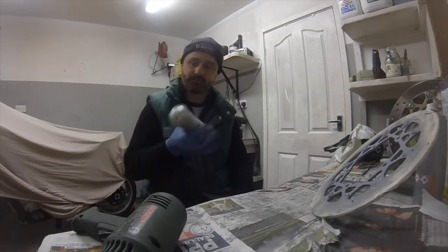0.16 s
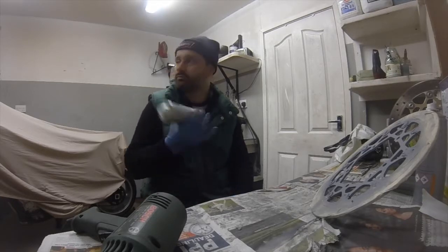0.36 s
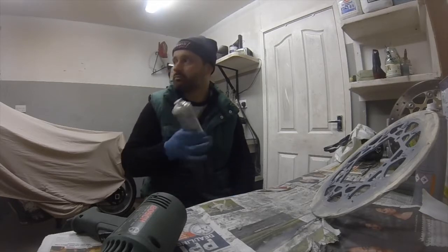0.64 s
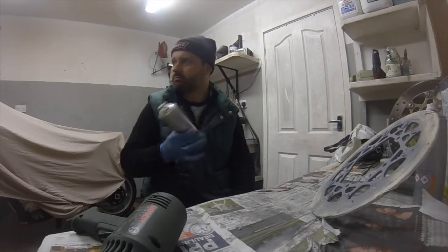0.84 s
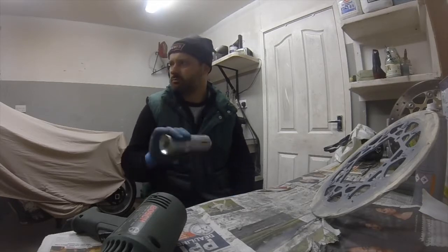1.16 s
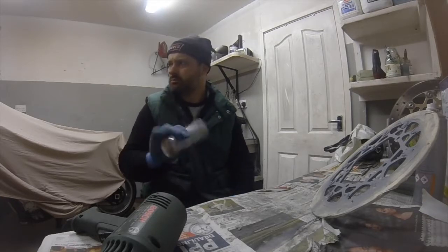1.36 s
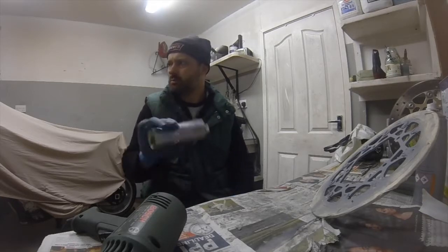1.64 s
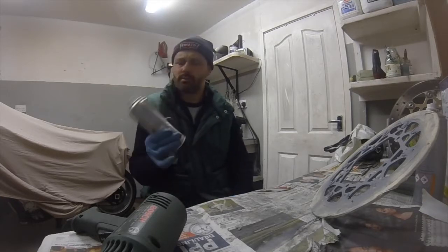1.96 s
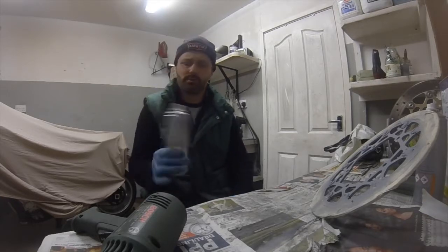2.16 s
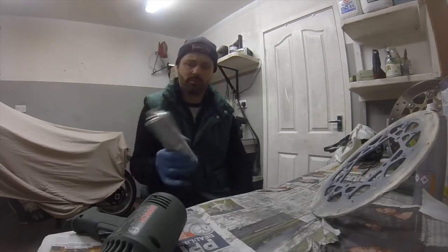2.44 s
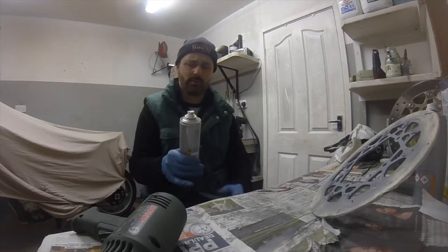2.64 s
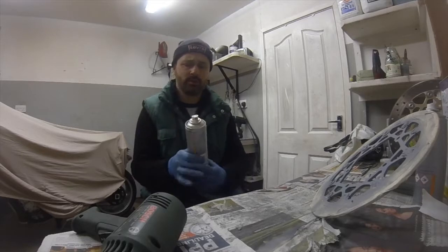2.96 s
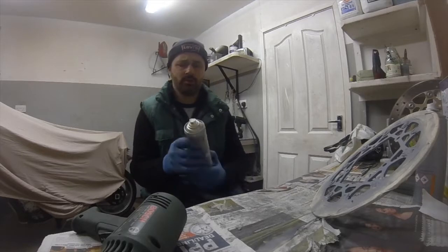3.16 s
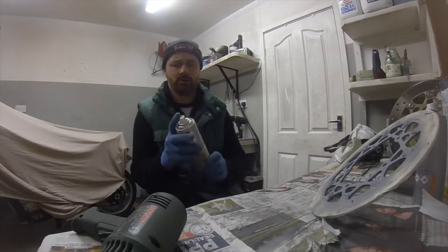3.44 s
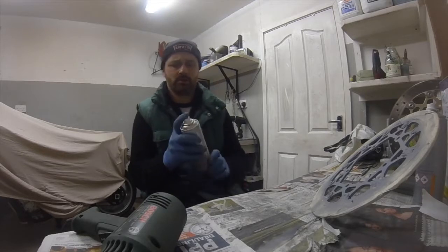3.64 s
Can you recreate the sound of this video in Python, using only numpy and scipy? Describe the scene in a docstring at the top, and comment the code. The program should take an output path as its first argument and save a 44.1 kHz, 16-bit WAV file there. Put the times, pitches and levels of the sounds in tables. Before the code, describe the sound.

A spray paint can is shaken vigorously close to the microphone in a small garage, its ball clacking sharply with light skittering and faint paint sloshes; then shaking stops, the ball drops, ticks and gloves rub.

```python
"""In a small garage, over a faint rumble and hum, a spray paint can is shaken by hand. Its mixing ball strikes
the ends about ten times a second, glances off the wall and skips lightly in between, and the paint sloshes.
The shaking stops, the ball drops once more, ticks and rolls, and gloves rub on the can. Contacts are snaps of
decaying noise with ringing modes, filtered by the shell's colours and answered by bench and room.
The slosh is swarms of sine bubbles; rub, roll and rumble are coloured noise."""
import sys
import numpy as np
from scipy import signal
from scipy.fft import rfft, irfft, next_fast_len
from scipy.io import wavfile
from scipy.ndimage import map_coordinates

SR = 44100
rng = np.random.default_rng(int(sys.argv[2]) if len(sys.argv) > 2 else 0)


def to_wav(s):
    """Save 16-bit WAV."""
    ch = np.atleast_2d(s).T  # columns
    pcm = np.round(np.clip(ch, -1, 1) * 32767)  # PCM
    wavfile.write(sys.argv[1], SR, pcm.astype(np.int16))


N = 167580


def amp(db):
    """Decibels to gain."""
    return 10 ** (np.asarray(db) / 20)


def unit(x):
    """Scale to rms 1."""
    return x / np.sqrt(np.mean(x ** 2) + 1e-20)


def along(points, hz):
    """Read a curve of (f/Hz, value) points on a log frequency axis."""
    f, v = np.transpose(points)
    return np.interp(np.log(hz + 1), np.log(f + 1), v)


def add(track, s, sound):
    """Mix a sound into a track at s seconds."""
    i = max(round(s * SR), 0)
    track[i:i + len(sound)] += sound[:len(track) - i]


def causal(points, size=1024):
    """Minimum-phase impulse response of a colour, by folding its cepstrum."""
    hz = np.fft.rfftfreq(size, 1 / SR)
    cepstrum = irfft(np.log(amp(along(points, hz))))
    cepstrum[1:size // 2] *= 2
    cepstrum[size // 2 + 1:] = 0
    return irfft(np.exp(rfft(cepstrum)))


def noise(points):
    """Steady coloured noise of rms 1."""
    m = next_fast_len(N + SR // 2)
    colour = amp(along(points, np.fft.rfftfreq(m, 1 / SR)))
    return unit(irfft(rfft(rng.standard_normal(m)) * colour, m)[:N])


def wobble(rate):
    """A smooth random curve through rate knots a second."""
    knots = rng.standard_normal(int(N * rate / SR) + 4)
    return map_coordinates(knots, [np.arange(N) * rate / SR])


# broad colour of the room's rumble: f/Hz, relative level/dB
RUMBLE_COLOUR = [(20, -4.5), (50, -4), (110, -10.5), (190, -12), (280, -12), (375, -11), (480, -20.5),
                 (900, -22.5), (1500, -23), (4000, -29.5), (6200, -39), (13000, -43.5), (15000, -56.5)]


def room_rumble(level_db=-55.5):
    """Steady broadband noise, strongest in the lows."""
    return amp(level_db) * noise(RUMBLE_COLOUR)


# faint tones in the room: f/Hz, rms level/dB
HUM_TONES = [(188, -72.5), (374, -72)]


def hum(waver_per_s=14):
    """Two low tones that waver in level and phase, as sine and cosine parts drift apart."""
    t = np.arange(N) / SR
    out = np.zeros(N)
    for hz, db in HUM_TONES:
        sine = wobble(waver_per_s) * np.sin(2 * np.pi * hz * t)
        cosine = wobble(waver_per_s) * np.cos(2 * np.pi * hz * t)
        out += amp(db) * unit(sine + cosine)
    return out


# how long each band of the room rings: f/Hz, T60/s
ROOM_DECAY = [(300, 0.17), (1500, 0.3), (5000, 0.37), (9000, 0.25), (15000, 0.55)]
# tone of the room's tail: f/Hz, relative level/dB
ROOM_TONE = [(300, 3), (1000, 2), (2500, 6.5), (5000, -2), (8000, 3.5), (14000, -6.5)]


def garage(size, room_db=-5, room_rise_s=.008, bench_db=-8, bench_s=.0052, bench_t60_s=.02,
           echo_db=5.5, echo_spacing_s=.0025, echo_blend_s=.052):
    """Scattered answer of the workbench and the room to a sharp click, as shaped decaying noise."""
    hz, t, z = signal.stft(rng.standard_normal(size + 256), SR, nperseg=256)
    decay_db = -60 * t / along(ROOM_DECAY, hz)[:, None]
    shape = amp(along(ROOM_TONE, hz)[:, None] + decay_db)
    tail = signal.istft(z * shape, SR, nperseg=256)[1][:size]
    t = np.arange(size) / SR
    # early echoes stand out in level, then blend
    echoes = np.interp(t / echo_spacing_s, np.arange(size), rng.standard_normal(size))
    rise = 1 - np.exp(-(t / room_rise_s) ** 2)
    tail = tail * rise * amp(echo_db * echoes * np.exp(-t / echo_blend_s))
    bench = rng.standard_normal(size) * (t > bench_s) * amp(-60 * t / bench_t60_s)
    return amp(room_db) * unit(tail) + amp(bench_db) * unit(bench)


def in_room(x, room_db):
    """A dry sound plus the garage's answer to it."""
    room = garage(size=SR // 2)
    return x + amp(room_db) * signal.fftconvolve(x, room / np.sqrt(len(room)))[:N]


# stretches in which the ball skips: start t/s, end t/s
SKIP_SPANS = [(0, .57), (.76, 2.15), (2.27, 2.54)]
# colour of the small contacts: f/Hz, relative level/dB
SKIP_COLOUR = [(150, -20), (500, -17), (900, 3), (1600, -2), (3000, -1), (5200, 1), (6500, -9),
               (10000, -16.5), (15000, -30.5)]


def skitter(per_s=70, level_db=-42.5, spread_db=7.5):
    """The ball skips lightly along the wall: brief noise taps at random times and levels, in the room."""
    taps = np.zeros(N)
    for start, end in SKIP_SPANS:
        for s in np.arange(start, end, 1 / per_s):
            tap = amp(-spread_db * rng.random()) * rng.standard_normal(size=130)
            add(taps, s + rng.random() / per_s, tap)
    coloured = signal.fftconvolve(taps, causal(SKIP_COLOUR))[:N]
    return amp(level_db) * unit(in_room(coloured, room_db=1.5))


def shell_crack(size, count=3, t60_s=.0051, rebound_s=.0012, rebound_db=-1.5, snap_db=11.5):
    """The shell snaps a few times in quick succession as the blow runs up and down it."""
    t, out = np.arange(size) / SR, np.zeros(size)
    for k in range(count):
        flex = rng.standard_normal(size) * amp(-60 * t / t60_s)
        flex[0] += amp(snap_db)  # sharp edge over the noise
        spacing = rebound_s * (1 + .15 * rng.uniform(-1, 1))
        add(out, k * spacing, amp(rebound_db * k * k) * flex)  # the loss grows with k squared
    return out


# ringing modes of the can, before random detuning and level spread: f/Hz, level/dB, T60/s
CAN_MODES = [(845, -35, 0.035), (1600, -40, .05), (2800, -22.5, .04), (5200, -52.5, .04),
             (5620, -21.5, 0.035), (10600, -39, 0.023)]


def shell_ring(size, spread_db=5, detune=.024):
    """Short decaying sines, the modes of the can, varied a little at each contact."""
    t, out = np.arange(size) / SR, np.zeros(size)
    for hz, db, t60 in CAN_MODES:
        envelope = amp(db + rng.normal(0, spread_db) - 60 * t / t60)
        out += envelope * np.sin(2 * np.pi * hz * rng.normal(1, detune) * t)
    return out


def spot(size=1024, ripple_db=2.5, width_hz=325.1):
    """Each spot on the shell favours other resonances: random peaks and dips in its colour."""
    hz = np.fft.rfftfreq(size, 1 / SR)
    ripple = map_coordinates(rng.standard_normal(size), [hz / width_hz], mode="mirror")
    return causal(np.column_stack([hz, ripple_db * ripple]))


# colours of the steel shell, each f/Hz, relative level/dB: main clack, low body, bright edge, domed base
CLACK_COLOUR = [(500, -50), (2000, -27.5), (3100, -17.5), (3600, -1.5), (4250, 0), (4550, 2), (4850, 2.5),
                (5050, 3.5), (5280, 4), (5600, -3), (6200, -6.5), (7000, -16.5), (10000, -39.5)]
BODY_COLOUR = [(100, -38), (350, -31), (520, -12), (700, -7.5), (900, 0.5), (1200, -3), (1550, 3.5),
               (2100, -2.5), (3000, 0.5), (6000, -64.5)]
EDGE_COLOUR = [(3000, -47.5), (6200, -15), (7400, -3), (7900, -4), (8600, -1.5), (9500, -4), (10000, -3),
               (11200, -11.5), (12400, -14), (13300, -18), (15000, -26.5), (15600, -34), (16500, -38)]
DOME_COLOUR = [(500, -55), (1200, -38), (2400, -7.5), (2800, -7.5), (3030, 2.5), (3300, -6), (3800, -21),
               (6000, -46.5)]


def shell_ranges():
    """Filters for the four ranges in which the shell answers: clack, body, edge, dome."""
    return np.array([causal(c) for c in (CLACK_COLOUR, BODY_COLOUR, EDGE_COLOUR, DOME_COLOUR)])


def contact(levels, ranges, room_db, size=3072):
    """One contact: the crack, the short ring of the shell and the room, weighted range by range."""
    source = shell_crack(size) + shell_ring(size)
    room = garage(size=SR // 2)
    ranges = signal.fftconvolve(ranges, spot()[None], axes=1)
    colour = sum(amp(db) * c / np.linalg.norm(c) for db, c in zip(levels, ranges))
    out = amp(room_db) * np.sqrt(size / len(room)) * signal.fftconvolve(room, colour)
    direct = signal.fftconvolve(source[None], ranges, axes=1)[:, :size]
    add(out, 0, sum(amp(db) * unit(d) for db, d in zip(levels, direct)))
    return out


def knocks(rows, clack_db, body_db, edge_db, dome_db, room_db):
    """Lighter contacts, in which the dome follows the clack; the settings trim the rows' levels."""
    out, ranges = np.zeros(N), shell_ranges()
    for s, clack, body, edge in rows:
        levels = [clack + clack_db, body + body_db, edge + edge_db, clack + dome_db]
        add(out, s, contact(levels, ranges, room_db))
    return out


# glancing knocks, before trims: t/s, clack level/dB, low body level/dB, bright edge level/dB
WALL_GLANCES = [(0.001, -31.5, -34.5, -39), (0.053, -17, -29.5, -24.5), (0.134, -26.5, -34.5, -25),
                (0.149, -19.5, -31.5, -27), (0.197, -26.5, -39, -34.5), (0.25, -27, -38, -38),
                (0.294, -43.5, -46, -51), (0.303, -47, -50, -45.5), (0.381, -24.5, -36.5, -39),
                (0.4845, -26.5, -40, -32.5), (0.499, -27.5, -49, -45), (0.559, -28, -34.5, -39.5),
                (0.676, -28, -29, -37.5), (0.708, -34, -53.5, -48), (0.772, -41.5, -30, -43),
                (0.801, -34.5, -30, -43.5), (0.865, -25, -34.5, -38), (0.942, -34.5, -40.5, -43),
                (0.979, -22.5, -34.5, -36.5), (1.002, -40, -38.5, -38.5), (1.045, -29, -44.5, -32),
                (1.08, -29, -57, -32.0), (1.101, -23, -29.5, -25.5), (1.207, -24, -44.5, -47),
                (1.306, -35, -43.5, -35.5), (1.398, -28, -47, -33), (1.43, -34.5, -33.5, -37),
                (1.51, -22, -41.5, -37), (1.537, -32.5, -46, -44.5), (1.56, -31.5, -37, -51.5),
                (1.637, -24.5, -63.5, -27.5), (1.662, -23, -33.5, -29), (1.757, -32, -44, -37.5),
                (1.788, -33.5, -37.5, -41), (1.86, -25.5, -51.5, -30.5), (1.876, -26, -61.5, -31.5),
                (1.897, -22.5, -32, -28), (1.993, -23, -36.5, -30), (2.026, -26.5, -36, -47.5),
                (2.074, -19, -34.5, -29), (2.093, -29.5, -55, -30.5), (2.105, -24.5, -41.5, -25.5),
                (2.124, -22.5, -28, -44), (2.282, -27.5, -55.5, -34), (2.311, -42.5, -48, -44),
                (2.368, -40, -41.0, -52), (2.391, -43.0, -37.5, -55.5), (2.431, -39.5, -48, -58),
                (2.507, -24, -55, -35.5), (2.524, -28.5, -36, -31.5), (2.549, -36, -42.5, -54)]


def wall_glances():
    """The ball glances off the wall of the can between strikes."""
    return knocks(WALL_GLANCES, clack_db=-13.0, body_db=-11.5, edge_db=-12, dome_db=-22.5, room_db=1)


# hard strikes, range levels before trims: t/s, clack level/dB, low body level/dB, bright edge level/dB,
# dome level/dB, room send level/dB
END_STRIKES = [(0.029, -3.5, -36, -17.5, -30.5, -3.5), (0.0404, -8, -28, -30, -32, 5.5),
               (0.1132, -3.5, -31.5, -16.5, -27.5, 2), (0.2342, -10, -39.5, -32.5, -29, -1),
               (0.3598, -4.5, -34, -17.5, -28, 0), (0.4613, -13.5, -34.5, -26, -42.5, 2),
               (0.5387, -8, -31.5, -28.5, -31, 4.5), (0.7474, -4, -30, -29, -22, -1),
               (0.848, -4, -27.5, -25, -22, -1), (0.9571, -1.5, -26.5, -25.5, -22, -4),
               (1.039, -7, -33.5, -23.5, -26.5, 3.5), (1.186, -10.5, -33.5, -18.5, -33.5, -3),
               (1.292, -11.5, -38, -31.5, -39, 3.5), (1.3865, -6, -36.5, -21, -42, -4.5),
               (1.4093, -4.5, -32, -29.5, -28, 1.5), (1.4763, -3, -38.5, -17, -30, -4.5),
               (1.6138, -3, -62, -17.5, -35.5, -10), (1.7364, -10, -43.5, -24.5, -33.5, 0),
               (1.835, -5, -56, -18.5, -30.5, -4), (1.9782, -10.5, -38, -23.5, -37, 0.5),
               (2.0592, -7.5, -32, -18.5, -28.5, -5.5), (2.2608, -3.5, -26.5, -24, -20.5, -0.5),
               (2.344, -2.5, -28, -20.5, -31, -5), (2.4497, -3, -27.5, -27, -21.5, -1.5)]


def end_strikes(clack_db=-24.5, body_db=-12.0, edge_db=-12.0, dome_db=-12):
    """The ball hits the ends of the can and rings the domed base; the settings trim the rows' levels."""
    out, ranges = np.zeros(N), shell_ranges()
    for s, clack, body, edge, dome, room in END_STRIKES:
        levels = [clack + clack_db, body + body_db, edge + edge_db, dome + dome_db]
        add(out, s, contact(levels, ranges, room))
    return out


# paint sloshing at the turn of a stroke: t/s, length/s, centre pitch f/Hz, dry level/dB
PAINT_SLOSHES = [(0.279, 0.046, 2970, -43), (0.682, 0.068, 1700, -40.5), (.765, 0.048, 2740, -48.5),
                 (0.862, 0.061, 3000, -40), (0.981, .055, 1750, -41), (1.294, 0.048, 3770, -39.5),
                 (1.411, .05, 1390, -42), (1.526, 0.055, 2290, -50), (1.776, 0.036, 2340, -46),
                 (2.008, 0.05, 2230, -41.5)]


def slosh(count=60, cycles=14, pitch_spread=.22):
    """Each slosh of paint is a swarm of short sine bubbles; the higher the bubble, the faster it dies."""
    out, t = np.zeros(N), np.arange(SR // 40) / SR
    for s, length, pitch, db in PAINT_SLOSHES:
        swarm = np.zeros(SR // 4)
        times = length * rng.beta(2, 2, count)
        pitches = pitch * np.exp(pitch_spread * rng.standard_normal(count))
        for when, hz in zip(times, pitches):
            add(swarm, when, np.sin(2 * np.pi * hz * t) * amp(-60 * t * hz / cycles))
        add(out, s, amp(db) * swarm * np.sqrt(length * SR) / np.linalg.norm(swarm))
    return in_room(out, room_db=-6)


# resonances of the base: f/Hz, relative level/dB
BASE_COLOUR = [(300, -30), (700, -13.5), (1150, -7.5), (1550, 1.5), (1850, -3.5), (2300, -10), (3000, 0),
               (3400, -10), (4100, -2), (4800, 3), (5500, -6), (6500, -21), (7500, -14), (9000, -19),
               (12500, -17.5), (15000, -31.5)]


def last_drop(at_s=2.7609, level_db=-38.5, room_db=-1):
    """The ball falls softly onto the base of the upright can and rings only its main resonances."""
    out = np.zeros(N)
    add(out, at_s, contact([level_db], causal(BASE_COLOUR)[None], room_db))
    return out


# ticks of the ball settling, before trims: t/s, clack level/dB, low body level/dB, bright edge level/dB
SETTLING_TICKS = [(2.8514, -48, -49, -64), (2.8883, -39, -49, -70.5), (2.9138, -33.5, -46.5, -74),
                  (2.9332, -32, -54, -73), (2.9503, -42, -52, -72), (2.9644, -32, -49, -72),
                  (2.9816, -27.5, -49.5, -56), (3.014, -34, -50, -70), (3.0784, -32.5, -52, -59),
                  (3.1173, -43, -52, -59), (3.1534, -43.5, -52, -58)]


def settling_ticks():
    """Faint contacts as the ball settles."""
    return knocks(SETTLING_TICKS, clack_db=-29.5, body_db=-12.5, edge_db=-11.5, dome_db=-29.5, room_db=-3)


def grainy_gain(rows, trim_db, grain_db=2.5, grains_per_s=110):
    """Gain along a level curve, roughened by fast random grain."""
    level_db = np.interp(np.arange(N) / SR, *np.transpose(rows), left=-120)
    return amp(level_db + grain_db * wobble(grains_per_s) + trim_db)


# level of the glove rub, before trim and grain: t/s, level/dB
RUB_LEVEL = [(2.869, -61), (3.0, -59), (3.15, -58), (3.35, -66.5), (3.701, -74.5), (3.8, -59)]
# colour of the glove rub: f/Hz, relative level/dB
GLOVE_COLOUR = [(300, -33), (1000, -12.5), (1600, 4.5), (2200, -3.5), (3000, 0), (3500, -0.5), (4800, -1),
                (6600, -24), (10400, -7), (15000, -22.5)]


def glove_rub():
    """Gloves rub on the can: coloured noise with a grainy level."""
    return noise(GLOVE_COLOUR) * grainy_gain(RUB_LEVEL, trim_db=-0.5)


# level of the rolling ball, before trim and grain: t/s, level/dB
ROLL_LEVEL = [(2.87, -72), (2.93, -62), (3.03, -62), (3.25, -70), (3.68, -85), (3.785, -60), (3.8, -51)]


def rolling_ball():
    """The ball rolls on the base: grainy noise in the clack's colour, fading, then swelling at the end."""
    return noise(CLACK_COLOUR) * grainy_gain(ROLL_LEVEL, trim_db=-3)


def scene():
    """The shaken can, then the settling ball and gloves, over the room's rumble and hum."""
    room = room_rumble() + hum()
    shaking = skitter() + wall_glances() + end_strikes() + slosh()
    settling = last_drop() + settling_ticks() + glove_rub() + rolling_ball()
    return (room + shaking + settling)[None]


def record(dry, top_hz=15600):
    """Cut everything from the band limit upward."""
    m = next_fast_len(N + SR // 2)
    keep = np.fft.rfftfreq(m, 1 / SR) < top_hz
    return irfft(rfft(dry, m) * keep, m)[:, :N]


dry = scene()
out = record(dry)
to_wav(out)
```